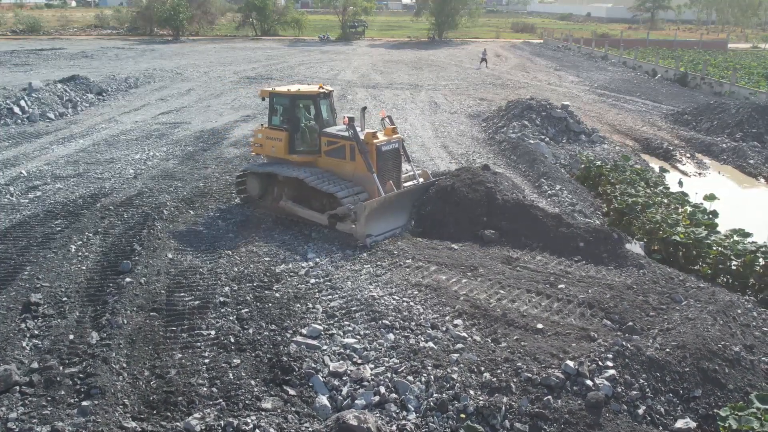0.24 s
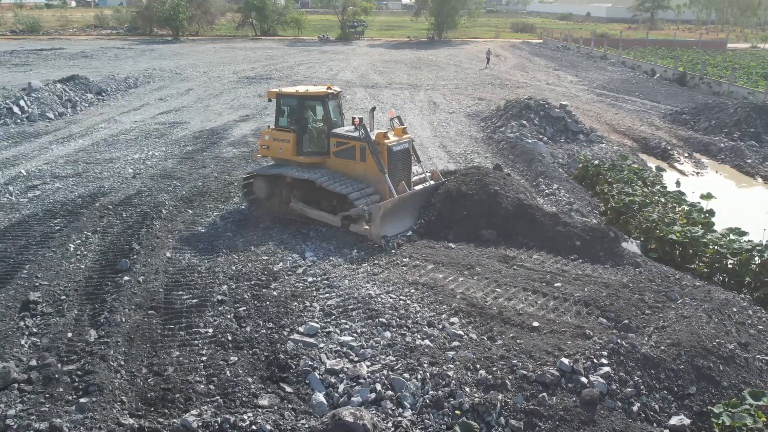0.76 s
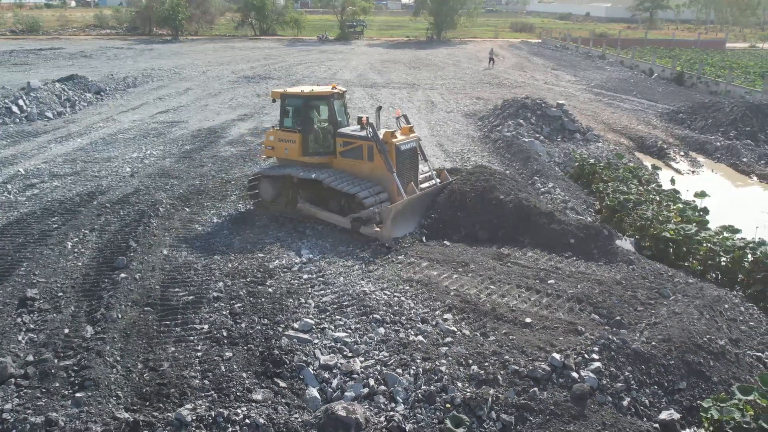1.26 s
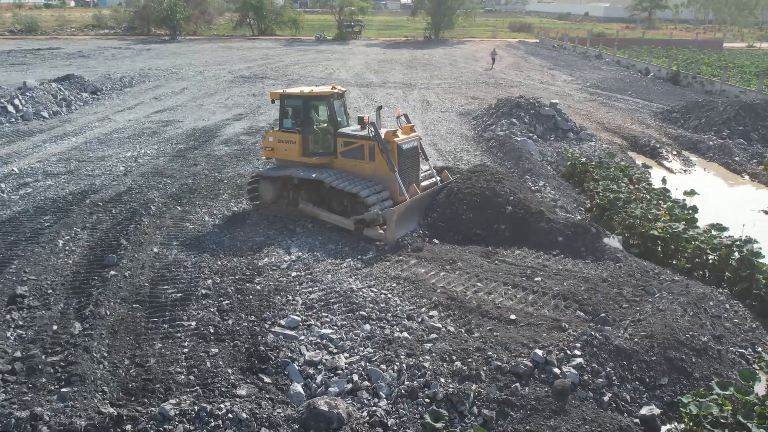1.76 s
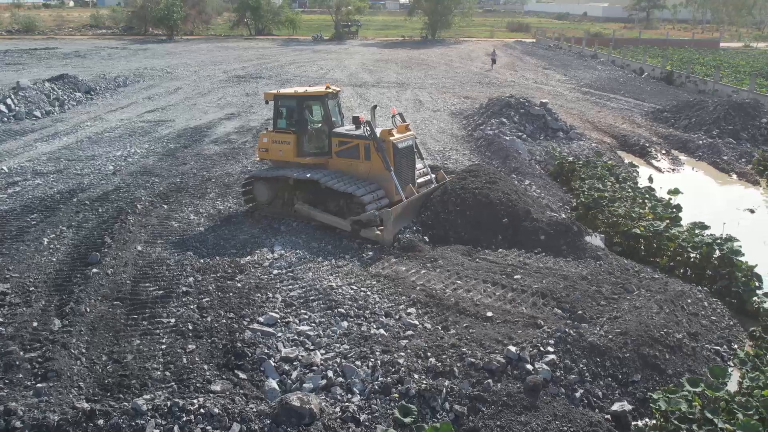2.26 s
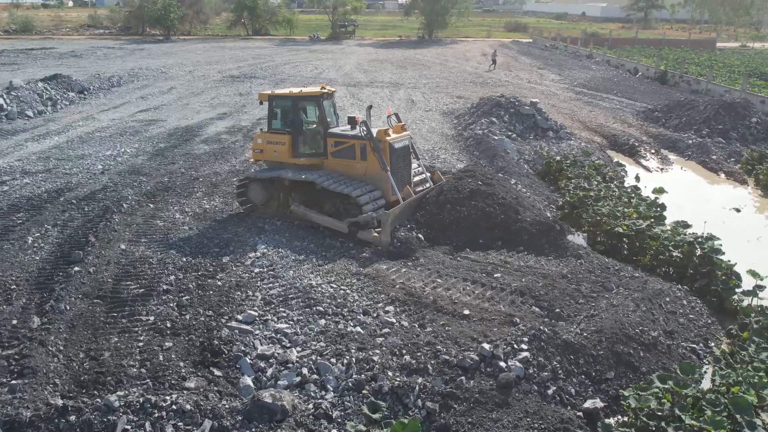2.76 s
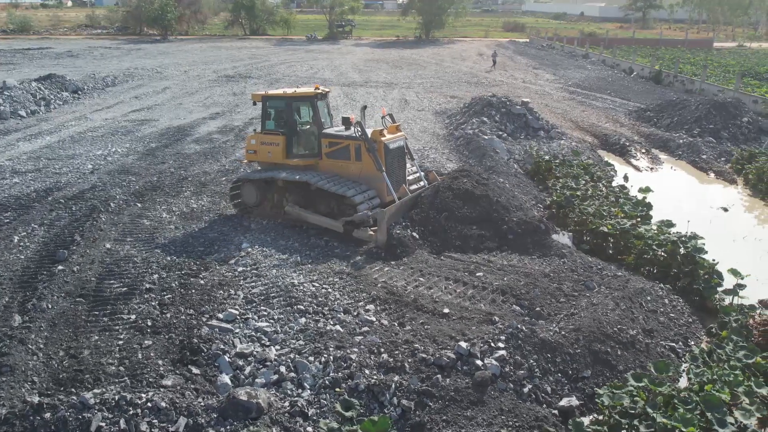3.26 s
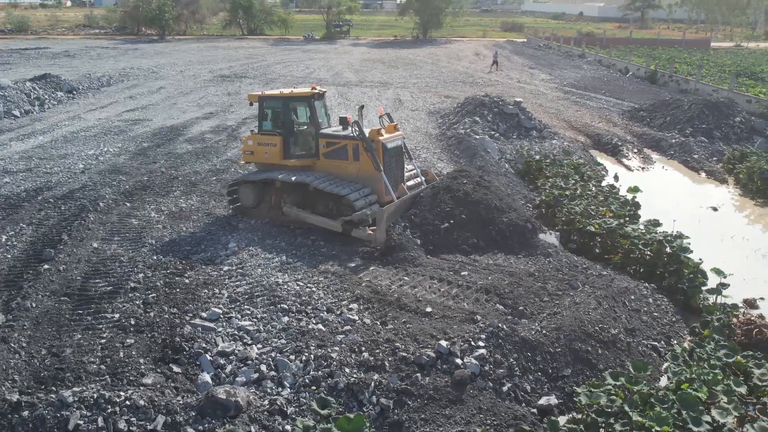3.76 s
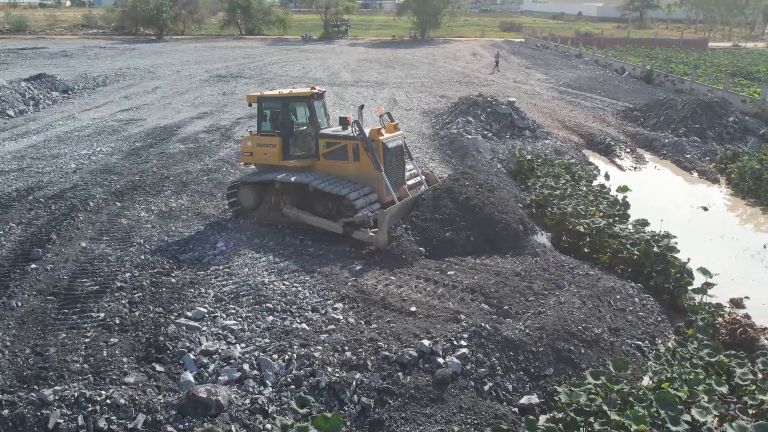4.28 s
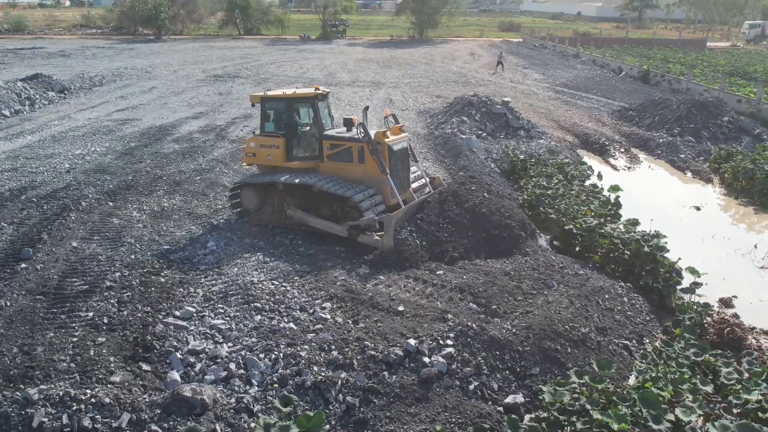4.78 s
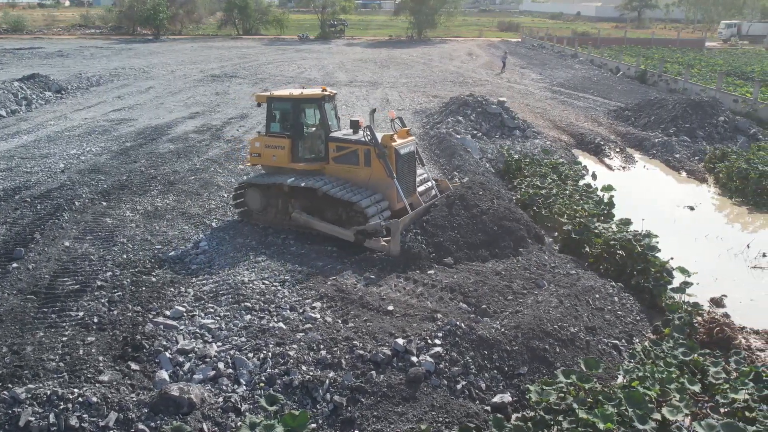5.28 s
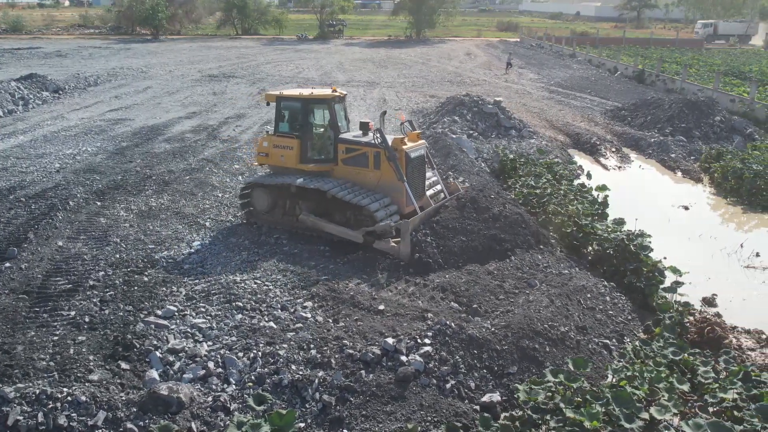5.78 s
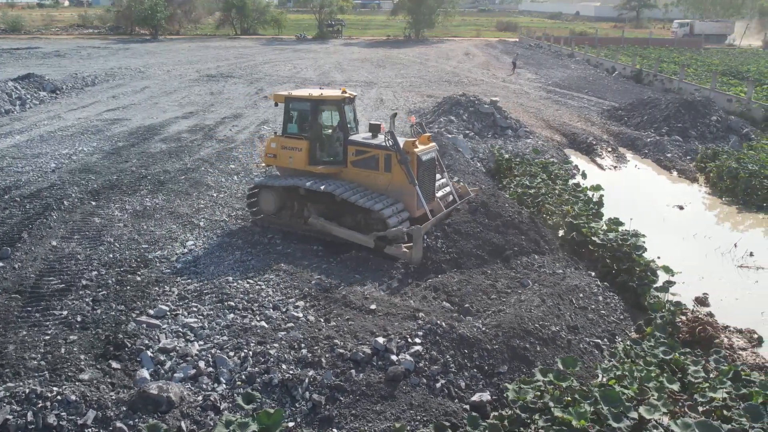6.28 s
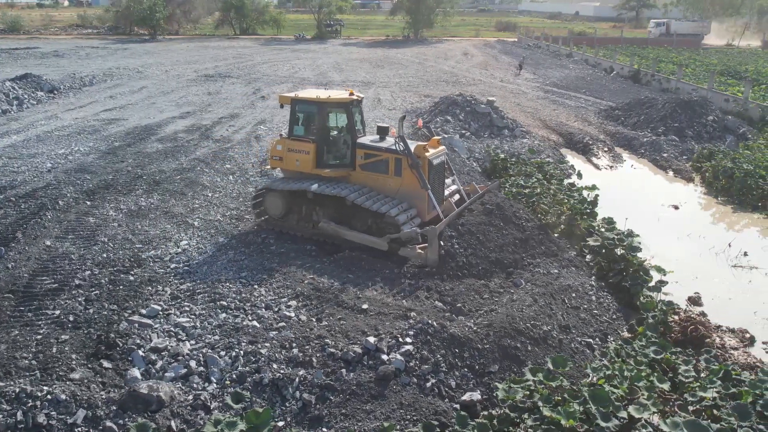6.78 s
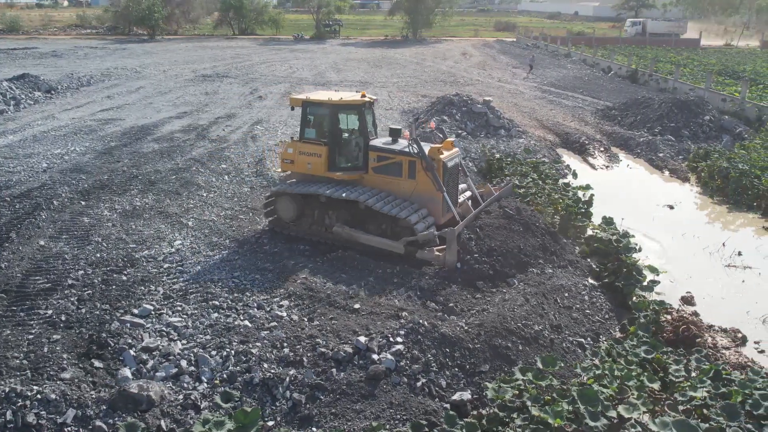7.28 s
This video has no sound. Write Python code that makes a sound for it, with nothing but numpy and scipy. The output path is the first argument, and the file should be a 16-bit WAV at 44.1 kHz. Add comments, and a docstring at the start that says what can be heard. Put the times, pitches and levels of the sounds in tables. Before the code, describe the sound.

A stereo outdoor pickup of a bulldozer some way off, almost central: low diesel drone with beating hums, loose track rattle, hollow metal clanks and brief high squeaks. The engine revs up, then gritty stone scraping surges in the middle. Near the end come loud sharp squeaks and lower steel groans. Short echoes scatter off stone heaps; a quick, quiet cricket chirr and thin hiss run throughout.

```python
"""A crawler bulldozer's diesel, some way off on open ground, speeds up under load: firing orders over shaped noise.
Low hums drift and throb as close tones beat. The running gear rattles in noise, track shoes clank as dying modes,
dry steel squeals as roughened tones, and the blade scrapes through stone in surges of gritty noise.
The sharp steel sounds echo off the stone heaps. Close to the microphones a cricket chirps in resonant noise,
over a far chorus; the microphones add a thin hiss."""
import sys
import numpy as np
from scipy import signal
from scipy.fft import rfft, irfft, next_fast_len
from scipy.io import wavfile
from scipy.ndimage import uniform_filter1d, map_coordinates

SR = 44100
rng = np.random.default_rng(int(sys.argv[2]) if len(sys.argv) > 2 else 0)


def store_pcm(level_fs):
    """Save levels as 16-bit WAV."""
    pcm = np.round(np.clip(level_fs, -1, 1) * 32767).astype(np.int16)
    wavfile.write(sys.argv[1], SR, np.atleast_2d(pcm).T)


N = 332514
TIME = np.arange(N) / SR  # s

# exhaust; the governor lifts the engine from idle to working speed, which sags once under load:
# (time [s], firing rate [Hz], firing tone level [dB])
FIRING = [(0, 82.2, -29), (.66, 83.2, -41), (1.64, 85.8, -34.5), (1.97, 88.9, -27), (2.29, 93, -32.5),
          (2.95, 102.6, -30), (3.85, 103, -28), (4.26, 99.4, -29), (4.59, 102.8, -27.5),
          (5.57, 103.6, -26.5), (6.23, 103.2, -37), (7.1, 103.8, -33.5), (7.54, 102.1, -29.5)]
# weaker engine orders: (order [sixths of the firing rate], level relative to the firing tone [dB])
ENGINE_ORDERS = [(5, -9), (7, -13), (8, -14), (9, -19), (10, -23), (12, -19)]
# broad engine noise: (time [s], relative rumble level [dB], relative engine bay level [dB])
ENGINE_NOISE = [(0, -38, -35.5), (.72, -41, -37), (.85, -35.5, -33.5), (1.5, -38, -35.5), (1.9, -36.5, -34),
                (3.3, -36, -33), (4.6, -37, -38), (5.9, -35.5, -37.5), (6.1, -38.5, -43.5), (7, -34.5, -43),
                (7.54, -37.5, -51.5)]
# colour of the rumble: (frequency [Hz], relative density [dB per Hz])
RUMBLE_COLOUR = [(15, -35), (40, -6), (100, -7.5), (240, -20.5), (310, -29.5), (420, -23.5), (600, -31.5),
                 (2000, -33), (5000, -66), (12000, -99)]
# colour of the engine bay's roar: (frequency [Hz], relative density [dB per Hz])
BAY_COLOUR = [(500, -22.5), (750, -2), (950, 3), (1250, -4), (1500, -12.5), (2100, -20), (2800, -43),
              (3300, -31), (6000, -57), (10000, -87)]
# low hums of the machine, one list for each drifting line: (time [s], frequency [Hz], level [dB])
LOW_HUMS = [
    [(0, 45.14, -26.5), (.62, 45.5, -40.5), (1.1, 43.1, -30), (1.62, 44.37, -26.5), (1.82, 45.43, -14.5),
     (2.29, 46.84, -23.5), (2.9, 47.4, -20), (3.3, 46.22, -30.5), (4.26, 45.6, -23.5), (4.5, 46.5, -34),
     (4.92, 45.85, -29), (5.8, 43.17, -34), (6.56, 42.25, -45), (7.54, 46.4, -28)],
    [(.4, 63.2, -83), (.8, 68.96, -25), (1.6, 72, -51), (2, 56.8, -27), (2.6, 77.13, -32),
     (3.05, 77.7, -35)],
]
# a partner just above the lowest hum, sinking towards it overall, so that the throbs slow down:
# (time [s], throb rate [throbs per second], partner level [dB])
HUM_PARTNER = [(.71, 8.54, -40), (1.38, 8.47, -22.5), (1.55, 8.75, -43), (1.95, 8.35, -25),
               (2.25, 7.67, -40), (2.56, 5.04, -25.5), (2.9, 4.5, -27.5), (3.61, 5.03, -26), (4, 3.1, -29),
               (4.41, 3.07, -44)]
# the drive's hum: (time [s], frequency [Hz], level [dB], lower octave level [dB])
DRIVE_HUM = [(3.2, 110.7, -64, -47), (3.53, 114.6, -27.5, -46), (3.87, 119.5, -27.5, -36),
             (4.2, 120.4, -63, -64), (4.6, 121.6, -33, -29), (4.87, 120.4, -35, -27),
             (5.25, 118.1, -31, -30), (5.54, 120.7, -34, -25), (5.87, 117.3, -58, -36)]
# rattle of the running gear: (time [s], level [dB])
GEAR_RATTLE = [(0, -49), (.9, -49), (3, -44.5), (4.2, -40), (5.2, -42.5), (5.9, -45.5), (6.1, -48.5),
               (7.1, -48.5), (7.3, -59), (7.54, -51)]
# colour of the rattle: (frequency [Hz], relative density [dB per Hz])
GEAR_COLOUR = [(1100, -22), (1600, 2.5), (2100, 4), (2700, 1.5), (3300, -12), (5000, -49)]
# track shoes landing: (time [s], relative level [dB], boost of the low modes [dB])
SHOE_LANDINGS = [(0.7871, -32, 14.5), (1.1516, -32.5, 8.5), (1.5831, -32, 13.5), (1.8672, -33.5, 17),
                 (2.357, -37, 16), (2.7739, -33, 13), (3.5004, -32, -6), (3.6442, -28.5, 6.5),
                 (3.7596, -25.5, 1), (3.8929, -29.5, 10.5), (4.589, -34, -1), (5.8365, -32, 10.5),
                 (6.898, -44, 13)]
# ringing modes of a track shoe: (frequency [Hz], relative level [dB], time to fall 60 dB [s])
SHOE_MODES = [(832, -1, 0.79), (971, 0, 0.71), (1680, 6.5, 0.26), (2060, 14, 0.15), (2440, 8.5, 0.13),
              (2750, 7.5, 0.087)]
# long squeals and low groans of dry track pins:
# (start [s], length [s], first pitch [Hz], last pitch [Hz], first level [dB], last level [dB])
PIN_SQUEALS = [(.66, .39, 3930, 3980, -47, -51), (1.56, .28, 3950, 3910, -48, -52),
               (2.23, .09, 4810, 4690, -48, -48), (2.37, .09, 4500, 4430, -45, -47),
               (2.93, 1.48, 4476, 4440, -52, -54), (4.65, .57, 4450, 4590, -45, -46),
               (5.3, .53, 4580, 4470, -50, -52), (6.175, .08, 1540, 1600, -41, -41),
               (6.29, .38, 1045, 1015, -46, -41), (6.435, .19, 1280, 1262, -38, -42),
               (6.755, .14, 1540, 1534, -37, -43), (6.9, .2, 1116, 1095, -32, -36),
               (6.91, .13, 1654, 1640, -40, -42), (6.93, .1, 555, 550, -43, -44),
               (7.08, .1, 1010, 1000, -40, -45)]
# short squeaks of steel on steel and stone: (middle [s], length [s], pitch [Hz], level [dB])
SHORT_SQUEAKS = [(0.168, 0.058, 3870, -52), (0.24, 0.04, 4480, -53.5), (0.305, 0.045, 3850, -50.5),
                 (0.378, .05, 4470, -50), (0.446, 0.064, 3850, -52), (.6, 0.028, 3780, -52),
                 (0.8, 0.038, 3990, -40.5), (1.28, 0.043, 3860, -41.5), (1.45, 0.015, 3130, -41),
                 (1.728, 0.043, 4670, -42), (2.015, 0.051, 3630, -39.5), (2.18, 0.039, 4530, -54),
                 (2.472, 0.025, 4280, -45), (2.098, 0.033, 3980, -42), (2.169, 0.038, 3910, -45),
                 (2.568, 0.048, 3950, -49), (2.988, 0.066, 3840, -38.5), (3.064, 0.075, 4266, -47.5),
                 (3.119, 0.045, 4030, -37.5), (3.254, 0.049, 3960, -42), (3.864, .02, 8470, -47),
                 (3.946, 0.046, 8420, -48), (3.961, 0.025, 4253, -45), (4.188, 0.028, 4120, -36),
                 (4.43, 0.035, 4420, -40), (4.475, 0.048, 4086, -36.5), (4.527, 0.05, 3900, -38.5),
                 (4.604, 0.058, 2340, -37), (4.629, 0.063, 8430, -53.5), (4.642, 0.043, 3910, -37.5),
                 (4.86, 0.049, 4540, -39.5), (5.023, 0.063, 4567, -36.5), (5.047, 0.046, 3920, -40),
                 (5.48, 0.039, 5440, -47), (5.577, .04, 4308, -49), (5.71, 0.031, 3930, -50),
                 (5.479, 0.038, 9080, -53), (6.126, 0.084, 4457, -43.5), (6.304, 0.03, 4390, -21),
                 (6.368, 0.033, 5590, -43), (6.385, 0.032, 4400, -34), (6.403, 0.037, 2090, -43),
                 (6.533, 0.094, 2610, -48.5), (6.603, 0.053, 3040, -43), (6.697, 0.037, 2005, -43),
                 (6.678, .02, 4060, -31.5), (6.7, 0.028, 4050, -21), (6.774, 0.037, 3050, -41),
                 (6.79, 0.058, 5480, -51), (6.932, 0.034, 4370, -45), (6.928, 0.033, 2810, -39),
                 (6.906, .03, 3700, -58), (6.986, 0.073, 2247, -46), (7.049, 0.031, 2060, -43)]
# steel modes on which faint stray squeaks sing: (frequency [Hz])
STEEL_MODES = [2070, 2315, 2570, 3080, 3530, 4300, 4680, 8370, 8900]
# steady grinding of blade and tracks through stone: (time [s], relative level [dB])
GRIND_BED = [(0, -57), (3.6, -55.5), (3.85, -51.5), (4.4, -49), (5.3, -50.5), (5.4, -57), (5.97, -58),
             (6.27, -59), (6.9, -52.5), (7.12, -56), (7.25, -64)]
# surges as the blade bites: (start [s], held [s], relative level [dB], bright edge relative to the surge [dB])
BLADE_BITES = [(1.9, 0.14, -56.5, -8), (2.04, 0.096, -51, -6.5), (2.88, 0.063, -52, -18),
               (3.899, .07, -44, -11), (4.067, 0.055, -45.5, -12), (4.32, 0.046, -58, 5),
               (4.415, 0.05, -45.5, -8.5), (4.5, 0.067, -44.5, -5.5), (4.575, 0.065, -43.5, -4.5),
               (4.765, 0.011, -48.5, -1.5), (4.83, .04, -45.5, -6.5), (5.46, .04, -54.5, -7),
               (5.675, 0.028, -51, -15), (6.081, 0.16, -51.5, -8.5), (6.29, 0.42, -49, -7),
               (6.68, 0.17, -52, -16), (6.898, 0.07, -47, -17), (6.993, 0.12, -54.5, -9)]
# colour of stone grinding on steel: (frequency [Hz], relative density [dB per Hz])
RUBBLE_COLOUR = [(700, -12.5), (1800, -2), (2300, -2.5), (4000, -3), (6300, -7.5), (7300, -16),
                 (9000, -17.5), (11300, -44), (12200, -52)]
# colour of the blade's bright edge: (frequency [Hz], relative density [dB per Hz])
EDGE_COLOUR = [(5500, -8.5), (7000, -5), (8300, 5), (10000, -5.5), (11500, -7), (12200, -43)]
# resonances of the cricket's wings: (frequency [Hz], width [Hz], relative level [dB])
WING_RESONANCES = [(7964, 100, 3.5), (8140, 100, -4.5)]
# likeness of the two channels in broad noise: (frequency [Hz], left-right likeness [0 to 1])
CHANNEL_LIKENESS = [(60, 1), (240, 0.99), (500, 0.99), (1400, 0.98), (3770, 0.74), (15000, 0.051)]

SQUEAL_FADE_S = .03
OCTAVE_DB = -25.5  # the overtone of singing steel
ROUGH_HZ = 4480  # squeals this high flutter fully, lower ones run smoother
NEIGHBOUR, NEIGHBOUR_DB = .05, -9  # typical pitch offset (share) and level of a mode stirred beside a squeak
BITE_RISE_S, BITE_FALL_S = 0.0053, 0.01  # time to climb and to lose 10 dB
TOP_HZ = 15760  # band limit of the microphones


def amp(db):
    """Gain of a level in dB."""
    return 10 ** (np.asarray(db) / 20)


def unit(x):
    """x at rms 1."""
    return x / np.sqrt(np.mean(x ** 2) + 1e-20)


def along(points, hz):
    """(Hz, value) points read on a log frequency axis."""
    f, v = np.transpose(points)
    return np.interp(np.log(hz + 1), np.log(f + 1), v)


def curves(rows):
    """One value per sample for each column after the time."""
    s, *cols = np.transpose(rows)
    return [np.interp(TIME, s, c) for c in cols]


def wobble(rate):
    """A smooth random curve, rate knots a second."""
    knots = rng.standard_normal(int(N * rate / SR) + 4)
    return map_coordinates(knots, [TIME * rate])


def excerpt(length):
    """A random stretch of sample positions, so that each event takes its own piece of a curve."""
    return np.arange(length) + rng.integers(N - length)


def filtered(x, response):
    """x times a complex response of frequency."""
    m = next_fast_len(N + SR // 2)
    return irfft(rfft(x, m) * response(np.fft.rfftfreq(m, 1 / SR)), m)[..., :N]


def rush(colour, patchy_db):
    """Stereo noise of rms 1 with patches of random gain in time and frequency."""
    z = signal.stft(rng.standard_normal((2, N)), nperseg=512)[2]
    field = uniform_filter1d(rng.standard_normal(z.shape[1:]), size=5, axis=0)
    field = uniform_filter1d(field, size=8, axis=1)
    pair = signal.istft(z * amp(patchy_db * unit(field)), nperseg=512)[1][:, :N]

    def mid_side(hz):
        turn = np.arccos(np.clip(along(CHANNEL_LIKENESS, hz), -1, 1)) / 2
        return amp(along(colour, hz)) * [np.cos(turn), np.sin(turn)]

    mid, side = filtered(pair, mid_side)
    return unit(np.array([mid + side, mid - side]))


def tone(hz, db):
    """A sine of rms level db that follows the pitch curve."""
    return np.sqrt(2) * amp(db) * np.sin(2 * np.pi * np.cumsum(hz) / SR)


def chatter(hz, shake, steady):
    """Singing steel: a steady tone plus a narrow complex noise, shake, around it, with a faint octave."""
    turn = 2 * np.pi * (np.cumsum(hz) / SR + rng.random())
    voice = np.exp(1j * turn) + amp(OCTAVE_DB) * np.exp(2j * turn)
    return np.real((steady + shake) * voice)


def diesel():
    """Each firing pulses the exhaust; its tone and orders stand over rumble and the roar of the engine bay."""
    hz, db = curves(FIRING)
    tones = tone(hz + .2 * wobble(4), db + 1.2 * wobble(5))
    for sixths, under_db in ENGINE_ORDERS:
        tones += tone(sixths / 6 * hz, db + under_db + 2.5 * wobble(3))
    rumble_db, bay_db = curves(ENGINE_NOISE)
    bay = amp(bay_db - 1.0 + 0.38 * wobble(8.3)) * rush(BAY_COLOUR, patchy_db=2.0)
    rumble = amp(rumble_db + 5.5 + 0.77 * wobble(5)) * rush(RUMBLE_COLOUR, patchy_db=2.04)
    return tones + bay + rumble


def lasting(rows):
    """A gate open while the table lasts, with 0.1 s fades outside it."""
    inside = np.minimum(TIME - rows[0][0], rows[-1][0] - TIME)
    return np.clip(inside / 0.1 + 1, 0, 1)


def hums():
    """Low lines close in pitch, so that they beat; each sounds only around its table's span."""
    hz, db, octave_db = curves(DRIVE_HUM)
    drive = tone(hz, db + 1.0 * wobble(5.03)) + tone(hz / 2, octave_db + 1.3 * wobble(8.8))
    throbs, partner_db = curves(HUM_PARTNER)
    # half a turn out of step at its entry: it enters in a quiet gap
    gained = np.cumsum(throbs * (TIME > HUM_PARTNER[0][0])) / SR + .5
    turns = np.cumsum(curves(LOW_HUMS[0])[0]) / SR + gained
    partner = np.sqrt(2) * amp(partner_db) * np.sin(2 * np.pi * turns)
    lines = sum(lasting(rows) * tone(*curves(rows)) for rows in LOW_HUMS)
    return lasting(DRIVE_HUM) * drive + lasting(HUM_PARTNER) * partner + lines


def gear_rattle():
    """Loose running gear rattles as a coloured noise of unsteady level."""
    level_db = curves(GEAR_RATTLE)[0] + 2.1 * wobble(14) + 0.96 * wobble(60)
    return amp(level_db) * rush(GEAR_COLOUR, patchy_db=3.0)


def clanks():
    """Each landing shoe rings its modes unsteadily at new strengths, under a short crunch."""
    out, t, flutter = np.zeros(N + SR), np.arange(SR // 4) / SR, wobble(220)
    for s, db, low_db in SHOE_LANDINGS:
        ring = np.zeros(len(t))
        for hz, level, t60 in SHOE_MODES:
            boost = low_db if hz < 1300 else 0
            strength = amp(level + boost + 5.5 * flutter[excerpt(len(t))] - 60 * t / t60)
            pitch = hz * (1 + rng.normal(0, 0.0152))
            ring += strength * np.sin(2 * np.pi * pitch * t)
        grit = signal.lfilter([1], [1, -.7], rng.standard_normal(len(t)))
        crunch = 0.36 * amp(-60 * t / 0.036) * grit
        onset = 1 - np.exp(-t / 0.0018)
        out[round(s * SR):][:len(t)] += amp(db - 17.5) * onset * (ring + crunch)
    return out[:N]


def squeals(slip, waver, flicker):
    """Dry track pins stick and slip, each row singing roughly on one gliding pitch; several may sound together."""
    out = np.zeros(N)
    for s, length, first_hz, last_hz, first_db, last_db in PIN_SQUEALS:
        at = slice(round((s - SQUEAL_FADE_S) * SR), round((s + length + SQUEAL_FADE_S) * SR))
        done = (TIME[at] - s) / length
        inside = np.clip(np.minimum(done, 1 - done) * length / SQUEAL_FADE_S + .5, 0, 1)
        own = excerpt(len(done))
        back = own[::-1]  # the same stretch backwards, for a second course of the curves
        rough = first_hz / ROUGH_HZ
        glide_hz = first_hz + (last_hz - first_hz) * done
        hz = glide_hz * (1 + .006 * rough * (waver[own] + flicker[back]))
        level_db = first_db + (last_db - first_db) * done + 1.6 * waver[back] + 2.8 * rough * flicker[own]
        out[at] += inside * amp(level_db) * chatter(hz, (.25 + .75 * rough) * slip[own], steady=.75)
    return out


def stray_squeaks(grind_db):
    """Faint squeaks on the steel's modes crowd in where the grinding is hard."""
    count = 560
    pitch = rng.choice(STEEL_MODES, count) * rng.normal(1, .02, count)
    crowd = np.cumsum(amp(grind_db))
    when = np.searchsorted(crowd / crowd[-1], rng.random(count))
    length = .008 + .025 * rng.random(count)
    db = grind_db[when] + along(RUBBLE_COLOUR, pitch) - 3 + 4 * rng.random(count)
    return list(zip(when / SR, length, pitch, db))


def neighbour_squeaks():
    """Each listed squeak also stirs a fainter, shorter one on a mode a little above or below it."""
    beside = []
    for s, length, hz, db in SHORT_SQUEAKS:
        shift, side = rng.uniform(-1.1, 1, 2)
        pitch = hz * (1 + NEIGHBOUR * np.sign(side) * (.5 + abs(side)))
        beside.append((s + length * shift, length / 2, pitch, min(db, -38) + NEIGHBOUR_DB))
    return beside


def squeaks(grind_db, slip, waver, flicker):
    """Hard or low squeaks lock onto their mode; faint ones smear in pitch and level."""
    out = np.zeros(N)
    for s, length, hz, db in SHORT_SQUEAKS + neighbour_squeaks() + stray_squeaks(grind_db):
        at = slice(max(round((s - 2 * length) * SR), 0), round((s + 3 * length) * SR))
        late = (TIME[at] - s) / length
        tail = 0.13 * (late > 0) * np.sin(np.pi * late / 3) ** 2
        swell = np.exp(-(late / 0.65) ** 2) + tail
        rough = np.clip((-21.5 - db) / 25, 0, 1.2) * min(hz / ROUGH_HZ, 1)
        own = excerpt(len(late))
        voice = chatter(hz + 45 * rough * waver[own], rough * slip[own], steady=.9)
        out[at] += amp(db + 4 * rough * flicker[own]) * swell * voice
    return out


def grinding():
    """Grinding and bright edge levels in dB: a steady bed, with surges that jump out, hold and fall back."""
    # powers, so every dB is doubled: the bed's bright edge lies 12 dB under it
    power = amp(2 * curves(GRIND_BED)[0]) * amp([[0], [-24]])
    for s, held, db, edge_db in BLADE_BITES:
        away = np.maximum((s - TIME) / BITE_RISE_S, (TIME - s - held) / BITE_FALL_S)
        power = power + amp(2 * db - 20 * np.maximum(away, 0)) * amp([[0], [2 * edge_db]])
    return 10 * np.log10(power)


def scrape(grind_db, edge_db):
    """Stone grinds on steel in quick uneven surges, gritty with single cracking stones."""
    cracks = (rng.random(N) < .006) * rng.exponential(size=N)
    grit = unit(uniform_filter1d(cracks, size=40))
    surge = amp(6 + 1.3 * wobble(45) + 0.79 * wobble(140)) * unit(1 + 0.1 * grit)
    rubble = amp(grind_db) * rush(RUBBLE_COLOUR, patchy_db=2.5)
    edge = amp(edge_db) * rush(EDGE_COLOUR, patchy_db=4.0)
    return surge * (rubble + edge)


def heaps(x):
    """Echoes off the stone heaps, as decaying noise; the paths change as the machine crawls on."""
    out, step = np.zeros((2, N + SR)), SR // 5
    for at in range(0, N, step):
        decay = amp(-60 * np.arange(SR // 8) / SR / 0.31)
        tail = rng.standard_normal((2, SR // 8)) * decay
        echo = signal.fftconvolve(x[None, at:at + step], tail / np.linalg.norm(tail[0]), axes=1)
        out[:, at:at + echo.shape[1]] += echo
    return out[:, :N]


def cricket():
    """Chirps of three quick strokes ring the wing resonances, over a far chorus in the same resonances."""
    chirp = np.cumsum(20.9 + .6 * wobble(1.5)) / SR % 1  # chirps a second, as a phase
    # five slots a chirp, three are sung
    strokes = np.where(chirp < .6, np.sin(5 * np.pi * chirp) ** 2, 0)

    def wings(f):
        return sum(amp(db) * 1j * f * w / (c * c - f * f + 1j * f * w) for c, w, db in WING_RESONANCES)

    near, *far = rng.standard_normal((3, N))
    drive = (.3 + strokes) * near + .45 * np.array(far)  # the chorus differs left and right
    return amp(-58.0) * unit(filtered(drive, wings))


def scene():
    """The machine stands a little to the left, its sharp sounds scattering off the heaps; a cricket is close."""
    grind_db, edge_db = grinding()
    # complex stick-slip noise, slow waver and quick flicker shared by all singing steel
    singing = wobble(150) + 1j * wobble(150), wobble(22), wobble(55)
    steel = clanks() + squeals(*singing) + squeaks(grind_db, *singing)
    machine = diesel() + hums() + gear_rattle() + scrape(grind_db, edge_db)
    machine = machine + steel + amp(-8.5) * heaps(steel)
    return machine * amp([[.3], [-.3]]) + cricket()


def record(dry):
    """The microphones add a thin high hiss and keep nothing above their band limit."""
    hiss_colour = [(6000, -17), (12000, -0.5), (15500, 0.5)]  # (frequency [Hz], relative density [dB per Hz])
    hiss = filtered(rng.standard_normal(dry.shape), lambda hz: amp(along(hiss_colour, hz)))
    return filtered(dry + amp(-61.0) * hiss, lambda hz: hz < TOP_HZ)


dry = scene()
out = record(dry)
store_pcm(out)
```